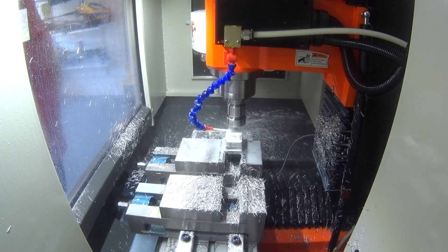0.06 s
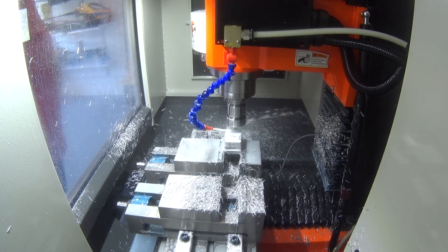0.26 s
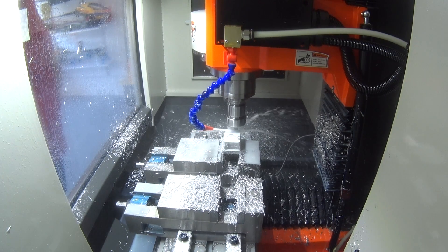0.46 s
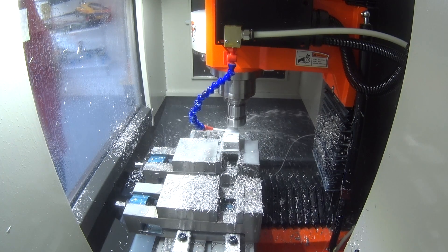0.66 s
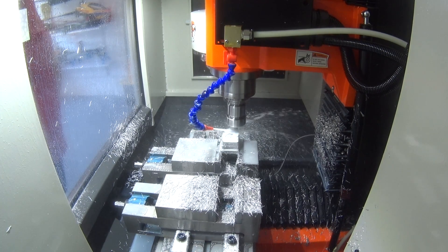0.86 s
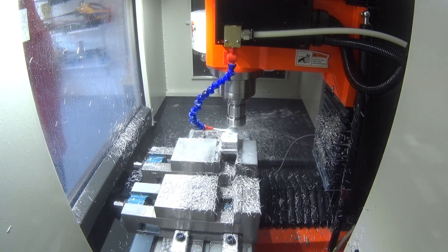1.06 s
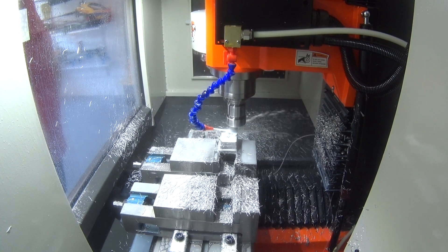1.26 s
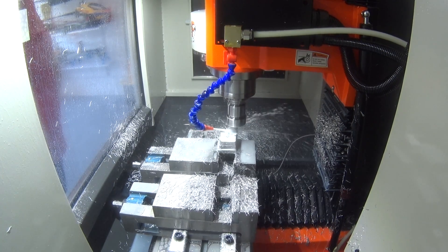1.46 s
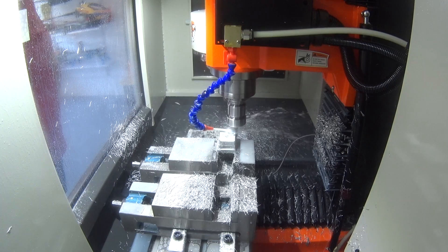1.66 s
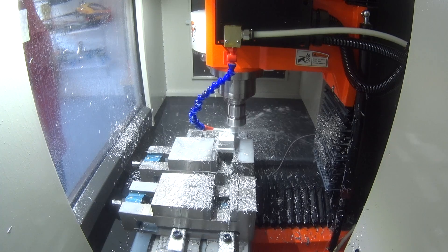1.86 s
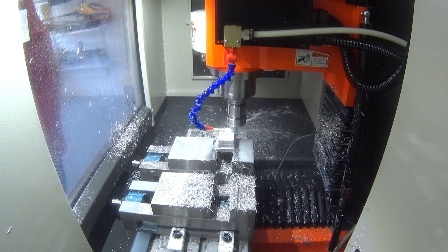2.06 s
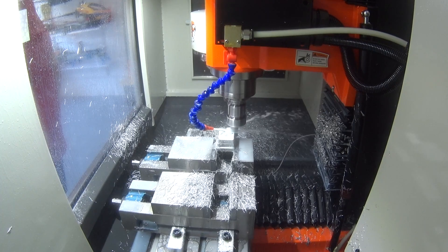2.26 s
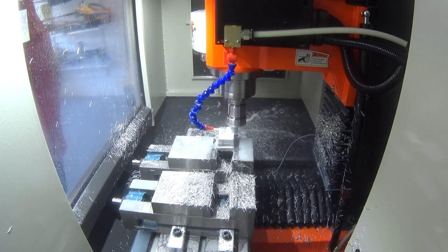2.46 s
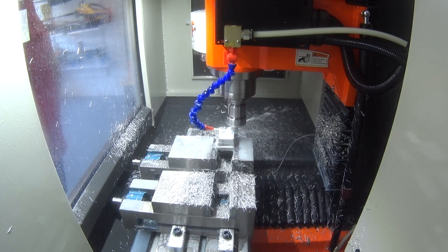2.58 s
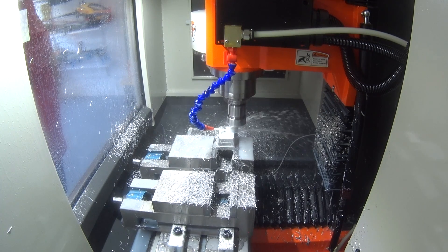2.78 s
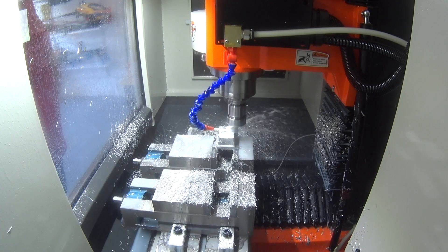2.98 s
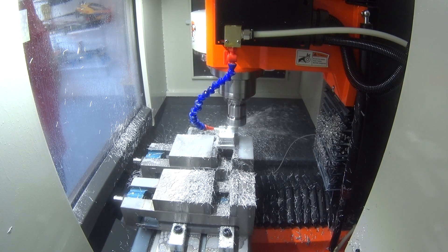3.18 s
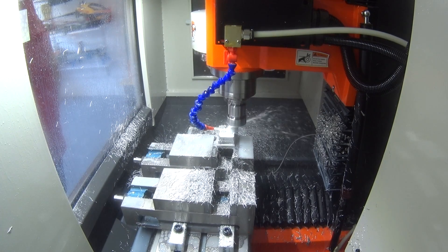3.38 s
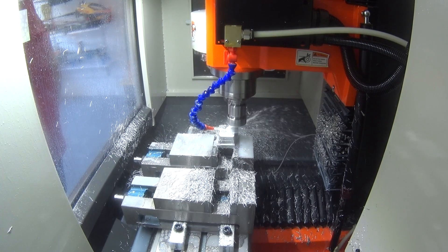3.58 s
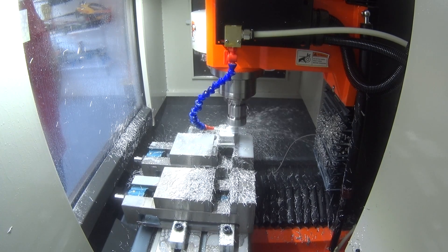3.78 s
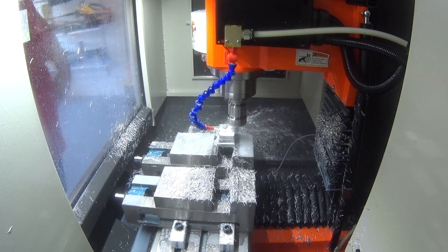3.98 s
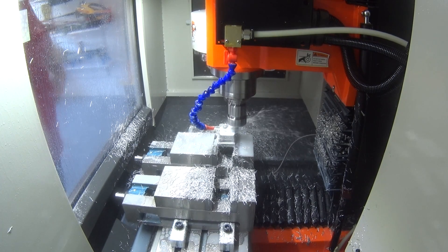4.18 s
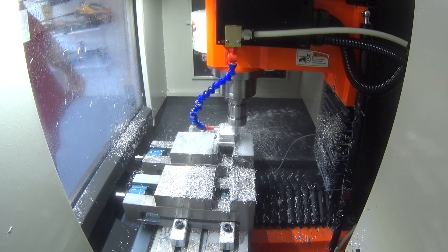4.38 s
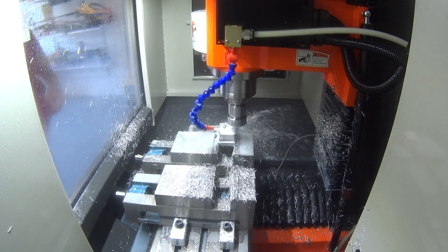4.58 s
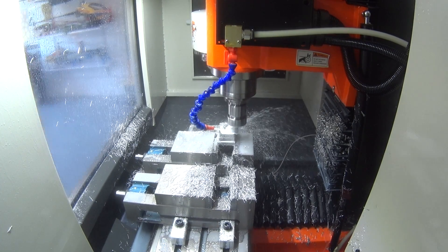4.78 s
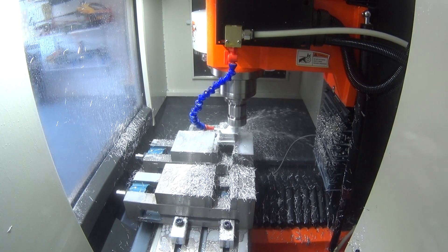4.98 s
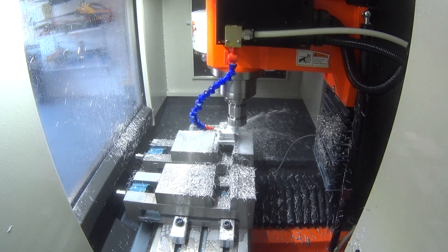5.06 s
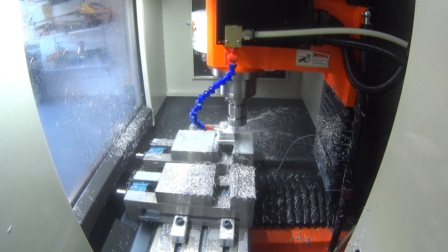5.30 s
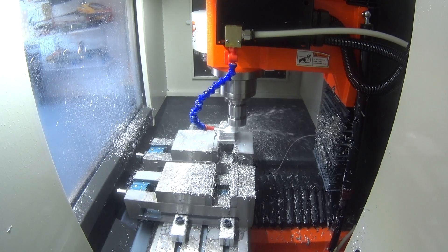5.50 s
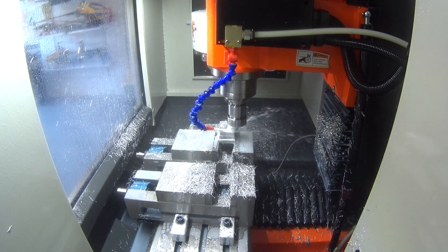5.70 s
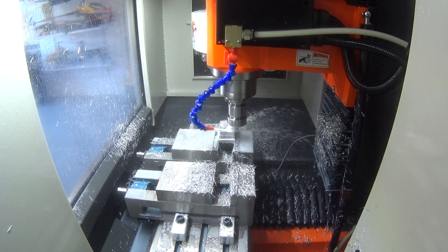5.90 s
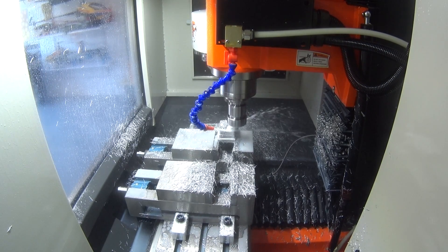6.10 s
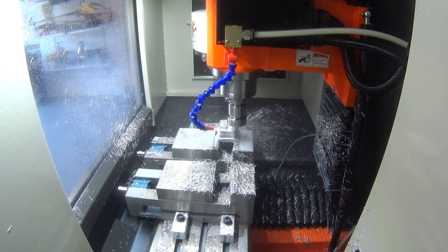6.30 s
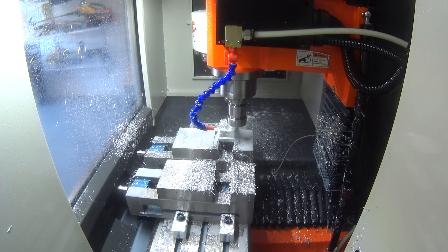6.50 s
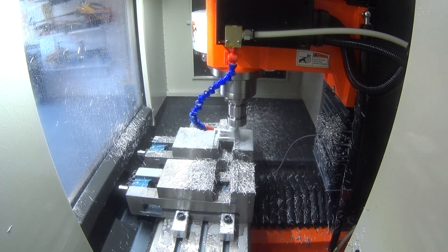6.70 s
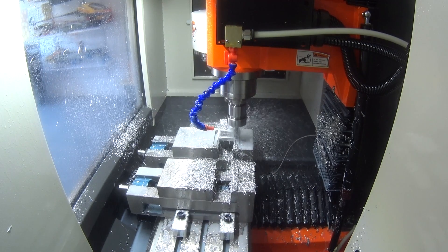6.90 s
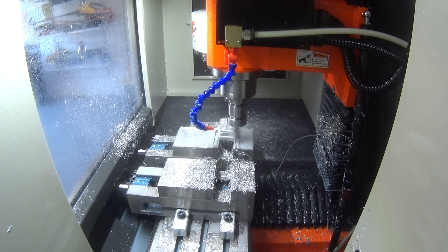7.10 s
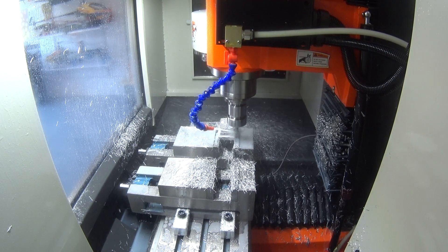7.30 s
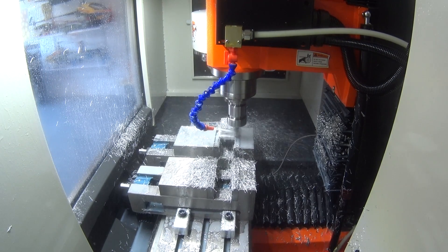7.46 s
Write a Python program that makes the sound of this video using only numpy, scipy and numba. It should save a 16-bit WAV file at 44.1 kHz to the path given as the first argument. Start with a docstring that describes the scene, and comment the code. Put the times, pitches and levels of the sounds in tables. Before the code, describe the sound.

A milling machine cuts aluminium without pause inside a closed metal enclosure, heard by a close stereo microphone. A shrill cluster of tones, strongest near 5.5 to 6 kHz, beats and shimmers, its parts fading and returning as the table travels; steadier bearing whines lie around 3 to 4.5 kHz. Gritty, ringing cutting hiss and constant fan noise fill the space, moving only slightly left and right. Low panel booms swell near 0.7, 2.2 and 2.6 s. At 3.4 s a short feed-motor hum falls in pitch, then drives growl from about 3.5 to 4.5 s, with a deep frame shudder at 4 s. A strong 113 Hz hum stays until about 8 s, while the shrill tone thins near 5.7 s and recovers by 6.6 s. More booms and shudders come at 6.7, 7.5 and 8.1 s; drives surge to 8.4 s, then the hiss and low hum ease while the whine continues to the end.

```python
"""Inside a closed sheet-metal enclosure a milling spindle cuts aluminium.
The spindle tones are sines at multiples of the shaft speed: whole ones from shaft and cutter,
fractional ones from bearings and drive train, with beating clusters between the cutter tones near the 50th.
Filtered noise gives the cutting hiss, the rough ring of the tool, feed drives, panel boom, frame rumble and air.
A feed motor adds a falling hum."""
import sys
import numpy as np
from scipy import signal
from scipy.fft import rfft, irfft, next_fast_len
from scipy.io import wavfile
from numba import njit

SR = 44100
rng = np.random.default_rng(int(sys.argv[2]) if len(sys.argv) > 2 else 0)


def boost(x):
    """Linear amplitude factor 10**(x/20) for a level x in decibels (scalar or array-like)."""
    u = np.asarray(x, float) / 20
    return 10 ** u


def put_to_file(sound):
    """Save the sound as 16-bit audio at rate SR, in the file named by the first command-line argument."""
    columns = np.atleast_2d(sound).T  # one column per channel
    safe = np.clip(columns, -1, 1)
    whole_steps = np.round(safe * 32767)
    wavfile.write(sys.argv[1], SR, whole_steps.astype(np.int16))


N = 425565
BLOCK = 64  # samples between control values of the tones

# Spindle speed, lifting when the load eases: t/s, speed/(revolutions per s)
SHAFT_SPEED = [(0, 112.53), (3.35, 112.53), (3.47, 112.64), (3.65, 112.55), (3.98, 112.5), (4.14, 112.79),
               (4.3, 112.66), (4.4, 112.68), (4.55, 112.56), (4.8, 112.47), (5.2, 112.54), (7.35, 112.53),
               (7.5, 112.44), (7.75, 112.57), (8.1, 112.64), (8.25, 112.66), (8.36, 112.6), (8.47, 112.64),
               (8.62, 112.52), (8.87, 112.42), (9.2, 112.52), (9.65, 112.54)]
# Position along the three legs of the tool path: t/s, leg (0-2)
PATH_LEG = [(0, 0), (3.1, 0), (4.4, 1), (7.7, 1), (8.5, 2), (9.65, 2)]
# Shaft and cutter tones: multiple of shaft speed, mean rms level/dB on each of the three legs
SHAFT_TONES = [(2, -47, -43, -43), (3, -54, -47, -51), (6, -59, -50, -49), (7, -54, -52, -49),
               (8, -49, -49, -66), (9, -56, -51, -46), (10, -58, -59, -51), (12, -48, -45, -41),
               (15, -56, -64, -52), (20, -51, -54, -53), (21, -48, -46, -51), (22, -36, -45, -54),
               (25, -41, -47, -48), (27, -41, -49, -58), (31, -51, -53, -49), (33, -51, -53, -61),
               (34, -49, -57, -49), (35, -50, -59, -56), (36, -58, -52, -50), (41, -51, -57, -52),
               (43, -57, -51, -50), (44, -41, -42, -47), (45, -38, -35, -39), (46, -40, -39, -40),
               (47, -41, -37, -37), (48, -37, -31, -40), (53, -31, -34, -36), (54, -41, -36, -45),
               (55, -47, -45, -62), (56, -62, -55, -66), (57, -50, -52, -55), (58, -44, -44, -48),
               (62, -67, -62, -63), (63, -53, -64, -74), (69, -55, -53, -56), (70, -63, -59, -61),
               (72, -56, -59, -62), (73, -58, -55, -56), (74, -59, -66, -68), (85, -67, -67, -67),
               (93, -68, -68, -62), (94, -66, -67, -60), (95, -66, -72, -60), (96, -65, -67, -62),
               (97, -62, -61, -63)]
# Bearing and drive-train tones; most high ones sit on a multiple of the ball-pass rate (9.62 a turn),
# shifted by whole turns and by the cage (0.57 a turn):
# multiple of shaft speed, mean rms level/dB on each of the three legs
BEARING_TONES = [(0.45, -53, -49, -54), (0.74, -54, -50, -50), (1.29, -48, -51, -58), (1.4, -47, -50, -48),
                 (1.66, -45, -46, -44), (2.25, -55, -55, -48), (2.42, -49, -52, -51), (2.66, -55, -54, -54),
                 (3.67, -52, -52, -57), (4.33, -63, -51, -53), (4.48, -60, -50, -46), (4.59, -42, -46, -43),
                 (4.84, -53, -55, -51), (5.48, -64, -49, -54), (5.59, -53, -68, -69), (5.77, -54, -63, -59),
                 (6.39, -54, -54, -55), (6.88, -53, -54, -56), (7.38, -55, -54, -60), (8.24, -40, -36, -41),
                 (8.62, -67, -52, -53), (9.24, -57, -54, -63), (9.62, -44, -57, -49),
                 (10.62, -46, -43, -53), (12.27, -51, -46, -52), (13.9, -55, -53, -64),
                 (15.87, -59, -54, -55), (18.24, -50, -54, -56), (19.24, -54, -55, -58),
                 (19.71, -54, -56, -63), (20.24, -46, -47, -50), (20.56, -55, -49, -53),
                 (22.14, -51, -59, -55), (23.96, -65, -58, -49), (24.04, -52, -52, -59),
                 (26.44, -52, -62, -59), (26.92, -50, -53, -64), (27.29, -64, -49, -47),
                 (27.86, -30, -42, -45), (28.42, -52, -44, -50), (28.86, -50, -53, -53),
                 (29.29, -42, -39, -41), (29.52, -44, -35, -39), (29.86, -35, -32, -36),
                 (29.96, -53, -42, -45), (30.42, -45, -42, -40), (30.86, -51, -52, -54),
                 (32.73, -56, -53, -52), (36.47, -48, -53, -55), (36.91, -36, -40, -41),
                 (37.34, -48, -52, -57), (37.48, -31, -41, -43), (38.04, -47, -45, -49),
                 (38.5, -49, -46, -52), (38.91, -38, -50, -49), (39.48, -37, -35, -36),
                 (40.04, -44, -50, -54), (40.67, -62, -63, -47), (56.15, -58, -56, -53),
                 (56.72, -48, -49, -67), (56.85, -51, -60, -68), (57.28, -53, -51, -57),
                 (58.72, -51, -53, -62), (59.15, -49, -47, -44), (59.72, -51, -49, -61),
                 (60.28, -49, -56, -60), (63.5, -61, -63, -62), (63.62, -61, -71, -71),
                 (64.77, -59, -65, -66), (65.9, -54, -54, -54), (66.47, -53, -59, -62),
                 (66.9, -56, -59, -67), (67.04, -49, -52, -58), (67.12, -72, -73, -59),
                 (68.2, -64, -59, -58), (68.77, -45, -49, -45), (69.34, -50, -54, -65),
                 (69.9, -60, -59, -65), (71.09, -60, -61, -61)]
# Beating clusters about halfway between cutter tones: centre multiple, level/dB on each of the three legs
CLUSTERS = [(44.62, -44, -48, -46), (45.58, -42, -44, -48), (46.54, -36, -37, -39), (47.5, -40, -44, -40),
            (48.5, -45, -38, -38), (49.51, -33, -34, -39), (50.49, -31, -32, -37), (51.47, -37, -41, -41),
            (52.45, -42, -44, -45), (53.44, -43, -46, -46), (54.41, -44, -48, -49)]
# Lines of one cluster: offset/multiples, level/dB re the cluster
CLUSTER_LINES = [(-.06, -9), (-.02, -10), (.02, -5), (.06, -5)]
# Shaft shaking the frame, multiple 1 harder on the middle leg:
# t/s, level/dB of multiple 1, level/dB of multiple 4
SHAKE_LEVELS = [(0, -43, -54), (1.0, -44.5, -49), (1.6, -42, -49), (3.2, -44, -46.5), (3.45, -54, -44),
                (4.0, -32, -43.5), (4.4, -35.5, -41), (5.2, -34, -47), (6.4, -33, -42.5), (7.6, -32, -42),
                (8.1, -36, -34.5), (8.8, -45, -39), (9.65, -42, -41.5)]
# Multiples of the two shaking tones
SHAKE_MULTIPLES = (1, 4)
# Multiples of the four leading cutter tones
CUTTER_MULTIPLES = (49, 50, 51, 52)
# Their levels apart from the fades: level/dB
CUTTER_LEVELS = (-27, -24, -19, -22.5)
# As the table travels, reflections cancel or feed each cutter tone for a while;
# one list a tone: t/s, change/dB, half-length/s
CUTTER_FADES = [
    [(1.5, -1, 0.26), (2.9, 0.5, .4), (3.9, -8, 0.31), (5.9, 6, 1), (8.55, 2, 0.31)],
    [(2.95, -9, .38), (3.93, -12, 0.13), (4.42, -12, .07), (7.3, 3.5, 0.5), (8.2, -9, 0.18),
     (8.65, -1, .45)],
    [(.6, -3, 1.2), (2.2, -4, 0.91), (3.9, 3.5, 0.35), (4.3, -3, 0.18), (6.55, -8, 0.52), (7.5, -4, .5)],
    [(0, -11, .3), (.65, -30, 0.34), (3.75, -6, .28), (4.78, -12, .22), (5.7, -46, 0.77), (6.6, 5, .4),
     (8.75, -9, 0.24), (9.4, -20, 0.61)],
]
# Cutting: t/s, hiss level/dB, left over right/dB of the hiss and spindle tones
CUT_COURSE = [(0, -37.5, 0), (1.1, -35.5, 1), (1.75, -36, 0.5), (2.7, -34, -0.5), (3.55, -37, -0.5),
              (4.44, -34.5, -0.1), (4.9, -38, 0.5), (6.15, -37, -1), (6.75, -34.5, -0.5), (7.8, -36, -0.6),
              (8.36, -35, -0.8), (8.8, -37.5, -0.3), (9.65, -38.5, -0.7)]
# Slope of the cutting hiss: f/Hz, density/dB per Hz re the hiss level
HISS_SLOPE = [(1500, -39), (3000, -29.5), (6000, -32), (6800, -39), (8300, -37), (9000, -48), (10400, -53),
              (11000, -51)]
# Resonances of tool and vice: f/Hz, width/Hz, density/dB per Hz re the hiss level
HISS_PEAKS = [(2820, 71, -26.5), (3323, 110, -23.5), (3600, 79, -25.5), (4395, 260, -24.5),
              (4660, 110, -26), (6630, 120, -24.5), (7720, 150, -33), (10960, 250, -44.5)]
# Rough ring of the tool, before its echoes: f/Hz, width/Hz, density/dB per Hz re the hiss level
TOOL_PEAKS = [(5140, 340, -16), (5560, 820, -13), (5860, 300, -19)]
# Feed drives, working harder around the corners: t/s, mean level/dB
DRIVE_LEVELS = [(0, -37), (2.0, -36.5), (2.9, -35), (3.3, -38.5), (3.55, -30), (4.06, -30), (4.22, -32.5),
                (4.44, -29), (4.8, -35), (6.15, -35.5), (6.45, -32), (6.8, -34), (7.3, -31.5),
                (8.36, -30.5), (8.6, -35.5), (9.65, -39)]
# Frame resonances shaken by the drives: f/Hz, width/Hz, density/dB per Hz re the drive level
DRIVE_PEAKS = [(144, 40, -23.5), (1194, 64, -25), (1357, 127, -22), (1576, 30, -28.5)]
# Feed motor running down at the first corner: t/s, f/Hz, rms level/dB
MOTOR_RUN_DOWN = [(3.33, 180, -60), (3.39, 182.4, -32), (3.43, 180, -28), (3.46, 153, -35), (3.5, 138, -31),
                  (3.55, 136, -57)]
# Resonance of a side panel: f/Hz, width/Hz, density/dB per Hz re the boom level
BOOM_PEAK = [(187, 28, -15)]
# Booms of the panel: t/s, change/dB, half-length/s
BOOM_SWELLS = [(.7, 9.5, .12), (1.02, 5, 0.09), (2.15, 11, 0.14), (2.6, 8.5, 0.16), (2.98, 8.5, 0.1),
               (3.41, 4, 0.046), (3.72, 9, 0.084), (4.44, 8.5, 0.14), (6.65, 7, .3), (7.44, 12, 0.078),
               (7.82, 12, 0.047), (8.09, 9, 0.079), (8.92, 3, .12), (9.22, -14, .1)]
# Frame resonances: f/Hz, width/Hz, density/dB per Hz re the rumble level
RUMBLE_PEAKS = [(50.3, 3.7, -17), (83.2, 5.9, -14)]
# Shudders of the frame: t/s, change of the rumble/dB, half-length/s
SHUDDERS = [(2.15, -1, 0.088), (2.52, 2, 0.16), (3.72, 14, 0.089), (4.02, 24, .15), (4.44, 5, 0.16),
            (5.21, 11, 0.11), (6.1, 9, 0.21), (6.76, 11, 0.094), (7.55, 19, 0.25), (8.09, 14, 0.12),
            (8.57, 16, 0.16)]
# Slope of the steady air and fan noise: f/Hz, density/dB per Hz
AIR_SLOPE = [(30, -95), (60, -120), (120, -68), (300, -71.5), (800, -67.5), (1800, -96), (3000, -72),
             (6000, -84), (11000, -119)]
# Enclosure resonances in the air noise: f/Hz, width/Hz, density/dB per Hz
AIR_PEAKS = [(244, 34, -59), (517, 61, -61.5), (616, 21, -62), (722, 24, -61.5), (930, 81, -64),
             (1033, 53, -62.5), (1725, 46, -64.5), (2330, 410, -68)]
# Correlation of the two channels in the noises: f/Hz, likeness (0-1)
LIKENESS = [(60, 0.98), (250, 0.9), (630, 0.62), (1600, 0.9), (2600, 0.55), (4200, 1), (6700, 0.56),
            (8300, 0.62), (9300, 0.82)]
# Phase lead of the left port: f/Hz, phase/rad
LEFT_LEAD = [(160, 0), (520, -.5), (780, -1.3), (1290, -.7), (2670, -.6), (3360, -.75), (4050, 0),
             (5770, -.3), (6120, 0), (6720, -.6), (7580, -.2), (8270, -.4), (8610, 0)]
# Level of the left port over the right: f/Hz, level/dB
LEFT_OVER_RIGHT = [(60, -1), (110, 0.5), (190, 1), (340, 3.5), (600, 3), (1070, -1.5), (1910, 1),
                   (3400, -0.5), (6050, 0.5), (10800, -1)]


def spindle(waver_db=1.0, flutter_db=.4, jitter_rad=.04):
    """Order synthesis: every tone is locked to the shaft angle; levels waver and phases jitter a little."""
    speed, = in_time(SHAFT_SPEED, count=BLOCK)
    turns = np.cumsum(speed) * BLOCK / SR
    multiples, gains = minor_tones()
    gains = gains * boost(waver_db * wavering(count=len(gains), rate_hz=0.46))
    multiples = np.append(SHAKE_MULTIPLES + CUTTER_MULTIPLES, multiples)
    gains = np.vstack([boost(loud_levels()), gains])
    gains = gains * boost(flutter_db * wavering(count=len(gains), rate_hz=6.0))

    start = 2 * np.pi * rng.random(len(multiples))
    # the cutter's ring sweeps in pitch within each turn, so it throbs less than a click train
    cutter = (multiples % 1 == 0) & (multiples > 43) & (multiples < 56)
    start[cutter] = -.75 * multiples[cutter] ** 2
    angles = 2 * np.pi * np.outer(multiples, turns) + start[:, None]
    angles = angles + jitter_rad * wavering(count=len(gains), rate_hz=5.9)

    # standing waves reach the two ports with a phase of their own for each tone above the 3rd multiple
    port_phase = .15 * (multiples > 3) * rng.standard_normal(len(multiples)) * [[1], [-1]]
    port = ports(multiples * SHAFT_SPEED[0][1]) * np.exp(1j * port_phase)
    peak_gains = gains * np.sqrt(2)
    return spin(angles, peak_gains, port, size=BLOCK)[:, :N]


def minor_tones():
    """Line spectrum of the weaker tones: multiples, and rms gains that pass from leg to leg of the path."""
    lines = []
    for centre, *levels in CLUSTERS:
        for offset, db in CLUSTER_LINES:
            lines.append((centre + offset, *np.add(levels, db)))
    rows = np.array(SHAFT_TONES + BEARING_TONES + lines)
    leg, = in_time(PATH_LEG, count=BLOCK)
    gains = np.array([np.interp(leg, range(3), boost(row[1:])) for row in rows])
    return rows[:, 0], gains


def loud_levels():
    """Forced vibration and interference: levels in dB of the two shaking and four cutter tones."""
    cutter = [db + swells(rows, count=BLOCK) for db, rows in zip(CUTTER_LEVELS, CUTTER_FADES)]
    return np.array(in_time(SHAKE_LEVELS, count=BLOCK) + cutter)


def wavering(count, rate_hz):
    """Low-pass random process of overall spread 1, one row a tone and one value a block."""
    r = np.exp(-2 * np.pi * rate_hz * BLOCK / SR)
    noise = rng.standard_normal((count, N // BLOCK + 1002))
    slow = signal.lfilter([1], [1, -2 * r, r * r], noise)[:, 1000:]  # drop the filter's run-in
    return slow / slow.std()


@njit
def spin(angles, gains, port, size):
    """Superposition of phasors, each turned step by step between its angles at the block edges."""
    out = np.zeros((2, (angles.shape[1] - 1) * size))
    for k in range(len(angles)):
        for b in range(angles.shape[1] - 1):
            pointer = gains[k, b] * np.exp(1j * angles[k, b])
            step = np.exp(1j * (angles[k, b + 1] - angles[k, b]) / size)
            for i in range(b * size, (b + 1) * size):
                out[0, i] += (pointer * port[0, k]).real
                out[1, i] += (pointer * port[1, k]).real
                pointer *= step
    return out


def cutting_hiss(level_db):
    """Broadband excitation of resonators: noise shaped by tool and vice, plus the rough ring of the tool."""
    hiss = coloured_noise(HISS_PEAKS, HISS_SLOPE, ripple_db=1.8)
    return (hiss + tool_ring()) * boost(level_db)


def tool_ring(memory=.65):
    """Regeneration: the tool meets its marks of two turns earlier, so noise gathers at whole and half multiples."""
    ring = coloured_noise(TOOL_PEAKS)
    lag = round(2 * SR / SHAFT_SPEED[0][1])  # samples in two turns
    echoes = sum(memory ** k * np.roll(ring, k * lag, axis=1) for k in range(4))
    return echoes * (1 - memory)


def feed_drives():
    """Structure-borne sound: noise through the frame resonances, its level following the drives."""
    level_db, = in_time(DRIVE_LEVELS)
    return coloured_noise(DRIVE_PEAKS, ripple_db=2.0) * boost(level_db + .8 * drift(9.0))


def motor_run_down():
    """Frequency modulation: a sine that swells and falls in pitch, and is faint and steady before and after."""
    hz, db = in_time(MOTOR_RUN_DOWN)
    return boost(db) * np.sqrt(2) * np.sin(2 * np.pi * np.cumsum(hz) / SR)


def panel_boom(rest_db=-42.5):
    """Plate resonance: narrow-band noise of a side panel, booming up at set times."""
    return coloured_noise(BOOM_PEAK) * boost(rest_db + swells(BOOM_SWELLS))


def frame_rumble(rest_db=-52):
    """Low-order resonance: two narrow noise bands of the frame, which shudders now and then."""
    return coloured_noise(RUMBLE_PEAKS) * boost(rest_db + swells(SHUDDERS))


def air_noise():
    """Stationary noise of air and fan, coloured by the enclosure resonances."""
    return coloured_noise(AIR_PEAKS, AIR_SLOPE, ripple_db=1.8)


def coloured_noise(peaks, slope=((1, -150), (20000, -150)), ripple_db=0):
    """Spectral shaping of the part common to both channels by slope and steep resonances; a side part widens it."""
    size = next_fast_len(N)
    hz = np.arange(size // 2 + 1) * SR / size
    power = boost(at_hz(slope, hz)) ** 2
    for centre_hz, width_hz, db in peaks:
        power = power + boost(db) ** 2 / (1 + (2 * (hz - centre_hz) / width_hz) ** 2) ** 2
    # the enclosure's dense modes leave fine random ridges and gaps about 9 Hz apart
    ripple = np.interp(hz / 9, np.arange(2500), rng.standard_normal(2500))
    power = power * boost(2 * ripple_db * ripple)
    mid, side = rfft(rng.standard_normal((2, size)))
    alike = np.clip(at_hz(LIKENESS, hz), 0, 1)
    pair = mid + np.sqrt((1 - alike) / (1 + alike)) * side * [[1], [-1]]
    return irfft(pair * ports(hz) * np.sqrt(power * SR / 2), size)[:, :N]


def ports(hz):
    """Transfer function: complex gains of the two microphone ports for a sound at hz."""
    half = boost(at_hz(LEFT_OVER_RIGHT, hz) / 2) * np.exp(.5j * at_hz(LEFT_LEAD, hz))
    return np.array([half, 1 / half])


def at_hz(points, hz):
    """Linear interpolation of a spectrum on a log-frequency axis."""
    f, value = np.transpose(points)
    return np.interp(np.log(hz + 1), np.log(f + 1), value)


def drift(rate_hz):
    """Low-pass random process of spread 1: noise at every 100th sample through a double one-pole."""
    r = np.exp(-200 * np.pi * rate_hz / SR)
    noise = rng.standard_normal(N // 100 + 1002)
    slow = signal.lfilter([1], [1, -2 * r, r * r], noise)[1000:]
    return np.interp(np.arange(N) / 100, np.arange(len(slow)), slow / slow.std())


def instants(count):
    """Sampling: times in s of every count-th sample, with a closing edge for the last block."""
    return np.arange(0, N + count - 1 + (count > 1), count) / SR


def in_time(rows, count=1):
    """Linear interpolation of table columns in time, one value every count samples."""
    s, *columns = np.transpose(rows)
    return [np.interp(instants(count), s, c) for c in columns]


def swells(rows, count=1):
    """Gaussian envelopes: bell-shaped rises and falls in dB, added up; one value every count samples."""
    t = instants(count)
    return sum(db * np.exp(-.5 * ((t - s) / half_s) ** 2) for s, db, half_s in rows)


def scene():
    """Superposition of all sources; the cut drifts across the stereo field with the table."""
    hiss_db, pan_db = in_time(CUT_COURSE)
    cut = spindle() + cutting_hiss(hiss_db)
    cut = cut * boost(np.outer([.5, -.5], pan_db))
    machine = feed_drives() + motor_run_down() + panel_boom() + frame_rumble()
    return cut + machine + air_noise()


def top_cut(x):
    """Low-pass filtering: nothing passes above about 11.4 kHz."""
    return signal.sosfilt(signal.butter(12, 11370, fs=SR, output="sos"), x)


def record(dry):
    """Elliptic low-pass filtering: a steep cut near a quarter of the sample rate."""
    # 0.5 dB passband ripple, 32 dB stopband attenuation
    low_pass = signal.ellip(10, .5, 32, SR / 4 - 20, fs=SR, output="sos")
    mix = signal.sosfilt(low_pass, dry)
    return top_cut(mix)


dry = scene()
out = record(dry)
put_to_file(out)
```